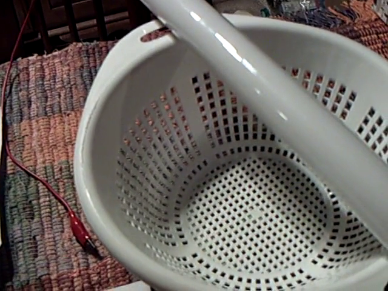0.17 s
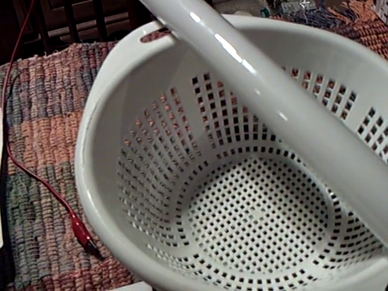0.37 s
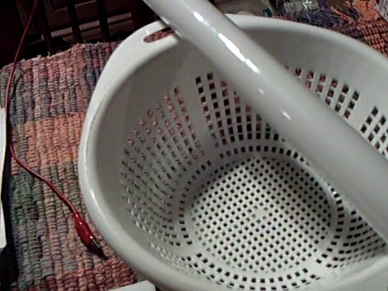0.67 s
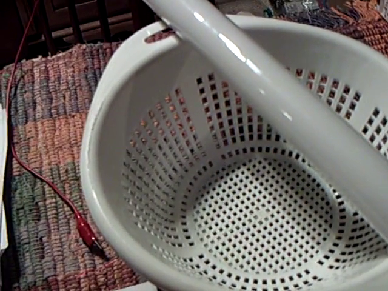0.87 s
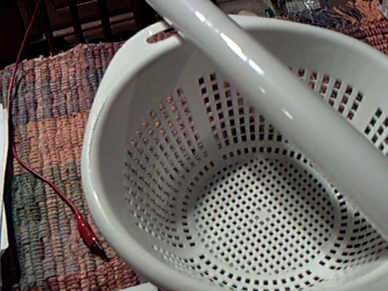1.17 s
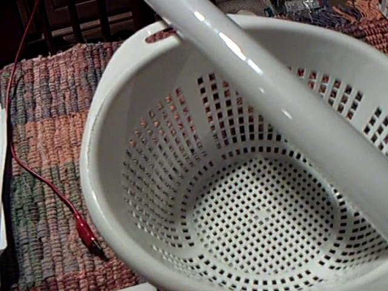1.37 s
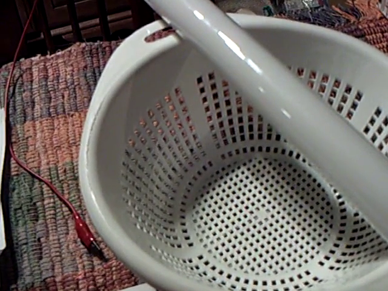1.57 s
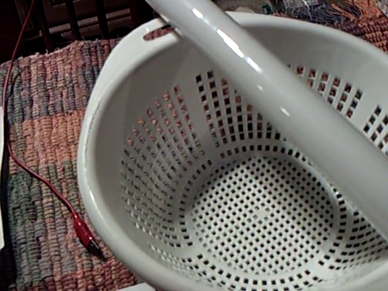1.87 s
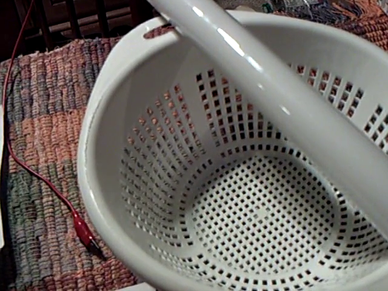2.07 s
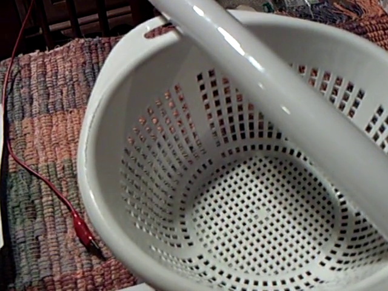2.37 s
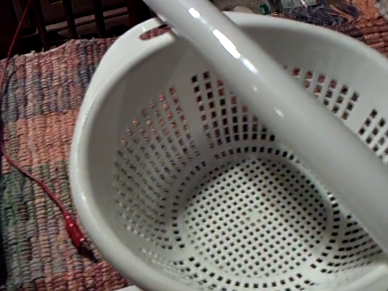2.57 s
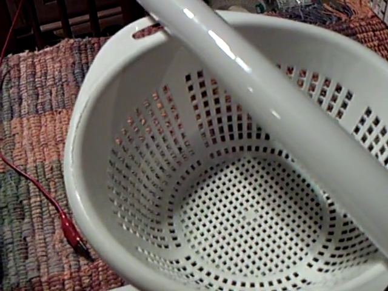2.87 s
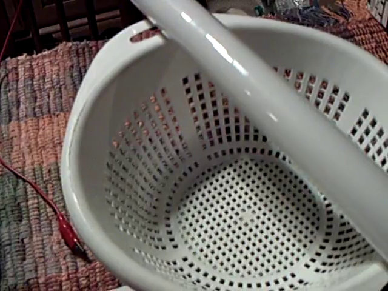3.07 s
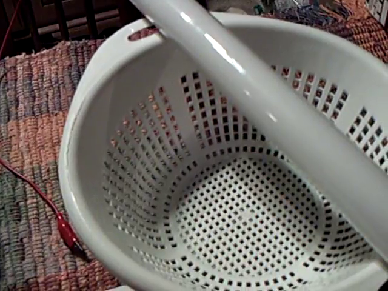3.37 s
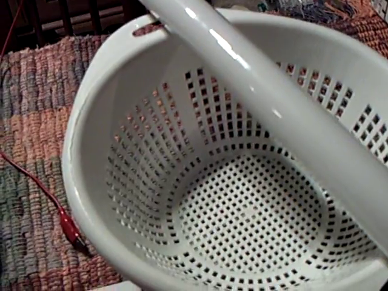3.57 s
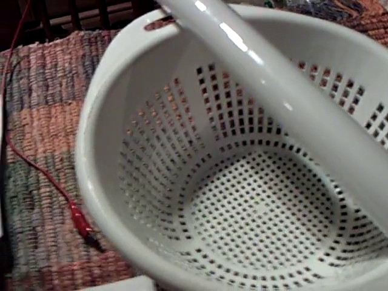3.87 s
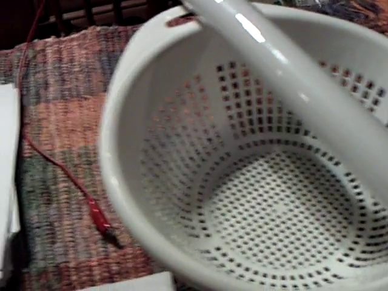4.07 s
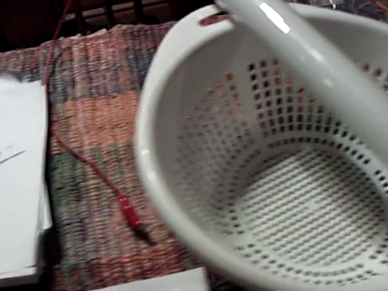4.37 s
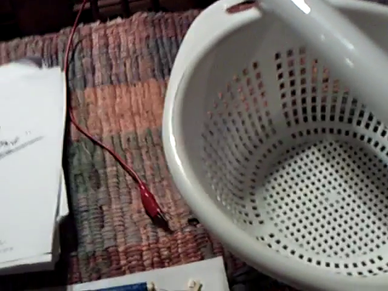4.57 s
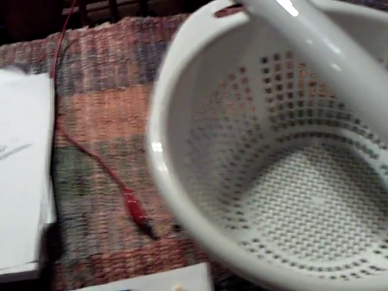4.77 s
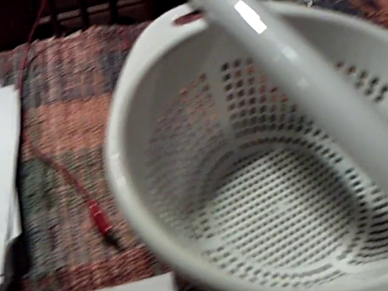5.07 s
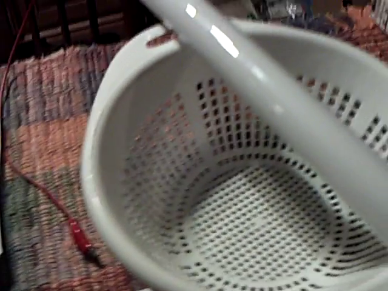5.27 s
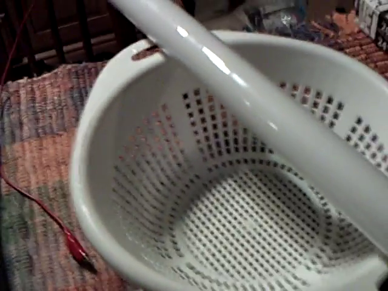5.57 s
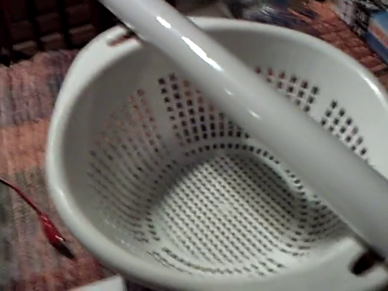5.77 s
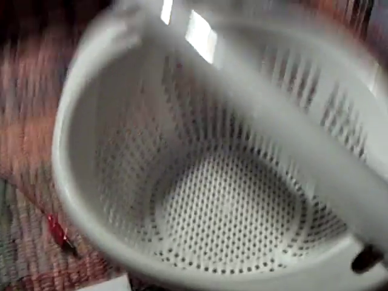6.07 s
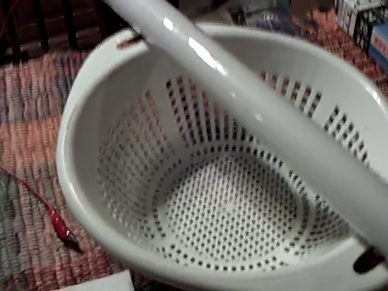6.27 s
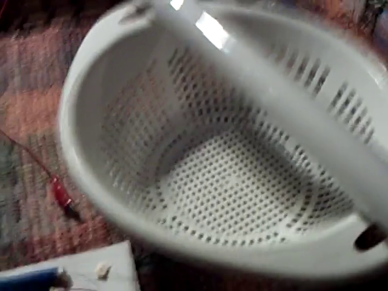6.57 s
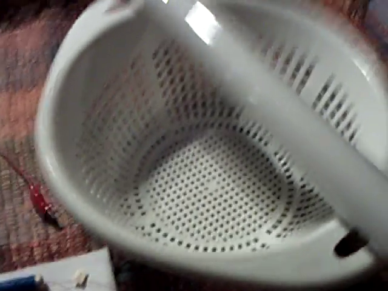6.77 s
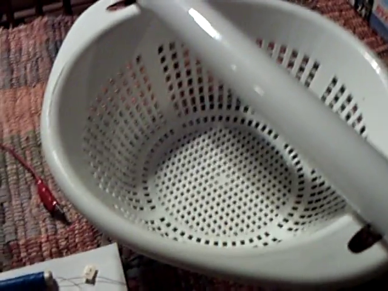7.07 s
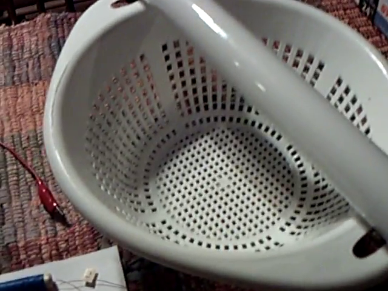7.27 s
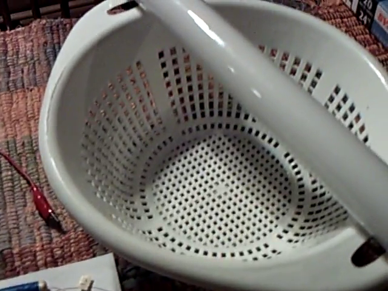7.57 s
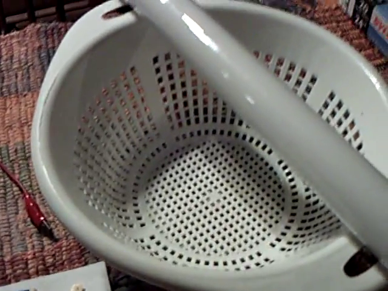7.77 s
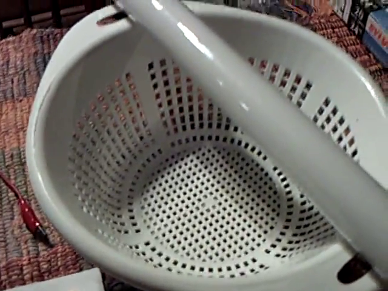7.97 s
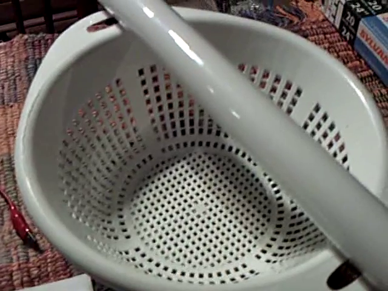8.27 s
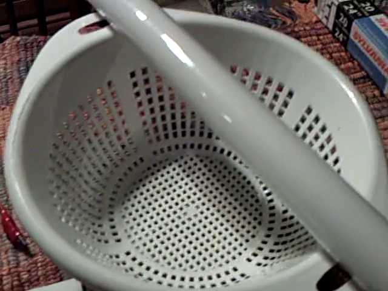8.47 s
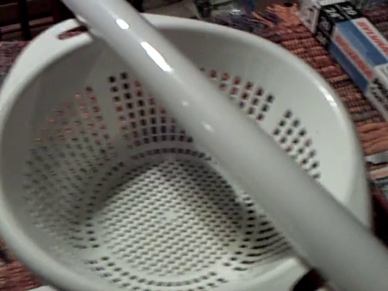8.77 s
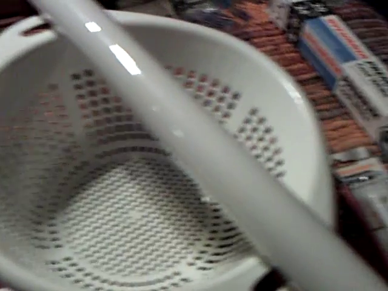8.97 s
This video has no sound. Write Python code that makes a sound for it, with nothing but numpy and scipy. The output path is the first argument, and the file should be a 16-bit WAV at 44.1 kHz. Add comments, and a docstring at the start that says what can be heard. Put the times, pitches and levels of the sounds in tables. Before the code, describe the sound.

A quiet room with low rumble, hiss and a very faint high electronic chirping, heard through a small hand-held camera. A few soft, dull knocks sound nearby. Then fingers tap, slide and snap against the plastic casing right at the microphone, with small creaks. Afterwards a distant motor hums faintly, climbing in pitch and swelling, joined by one knock and two tiny ticks before it fades.

```python
"""A quiet room through a small hand-held camera. Throughout: rumble, hiss, a faint chirping circuit.
Faint rustles near 0.6 and 2.2 s; dull knocks and a thin tick at 4-4.7 s. At 5.6-6.7 s fingers tap, slide
over and snap against the plastic casing, which rings and creaks; the grip pushes the microphone.
From 6.7 s a distant motor hums, climbs slowly in pitch and swells; a knock and two ticks fall near 8 s.
The hum fades out by 8.9 s."""
import sys
import numpy as np
from scipy import signal
from scipy.fft import rfft, irfft
from scipy.io import wavfile

SR = 44100
rng = np.random.default_rng(int(sys.argv[2]) if len(sys.argv) > 2 else 0)


def transcribe(u):
    """Save the signal u as a 16-bit wav file named by the first command-line argument.

    u: samples, shape (n,) or (channels, n), limited to [-1, 1]; the rate is SR.
    q: integer samples, one column per channel.
    """
    v = np.clip(np.atleast_2d(u).T, -1, 1)
    q = np.round(v * 32767).astype(np.int16)
    wavfile.write(sys.argv[1], SR, q)


N = 402633

# room noise spectrum: (frequency [Hz], relative density [dB])
ROOM_SPECTRUM = [(7, -32), (12, 2), (32, 0), (107, -1), (142, -3), (193, -7), (225, -6.5), (250, -9.5),
                 (331, -12.5), (857, -15.5), (1750, -23), (3500, -25.5), (4300, -24), (5200, -34),
                 (5600, -29.5)]
# noise bands in the room: (centre [Hz], width [Hz], rms [dB])
ROOM_BANDS = [(74.7, 2.6, -63.5), (136.8, 2.7, -62.5), (163.9, 9.2, -69), (4005, 230, -74.5),
              (4680, 490, -69), (5190, 320, -70)]
# faint rustles: (time [s], peak [dB], length [s], pitch [Hz], t60 [s])
FAINT_RUSTLES = [(0.553, -53, 0.24, 850, 0.036), (0.596, -54.5, 0.17, 340, 0.1),
                 (2.149, -48.5, 0.37, 338, 0.057)]
# thin ticks: (time [s], peak [dB], contact cutoff [Hz], chatter decay [s])
THIN_TICKS = [(4.62, -47.5, 9000, .003), (7.992, -51, 9050, .002), (8.092, -51, 9000, .002)]
# modes of the ticks: (frequency [Hz], gain [dB], t60 [s])
THIN_MODES = [(4000, -0.19, 0.031), (4300, -0.81, .02)]
# dull knocks: (time [s], peak [dB], contact cutoff [Hz], chatter decay [s])
DULL_KNOCKS = [(4.0035, -33.5, 2800, 0.0037), (4.013, -37, 700, 0.029), (4.1185, -39, 2500, 0.0076),
               (4.704, -39, 500, 0.0027), (4.714, -43, 600, 0.0042), (7.833, -23, 700, 0.00022)]
# modes of the knocks: (frequency [Hz], gain [dB], t60 [s])
DULL_MODES = [(244, -28, 0.024), (427, 21.5, 0.021), (535, 13, 0.036), (700, 19, 0.016), (850, 10.5, 0.052),
              (1200, 10, 0.016), (1570, -3, 0.025)]
# motor fundamental: (time [s], rms [dB])
MOTOR_FUNDAMENTAL = [(6.7, -64), (7.3, -66), (7.9, -49.5), (8.12, -49.5), (8.36, -45.5), (8.55, -48),
                     (8.72, -53), (8.9, -73)]
# swells of motor partials 2, 3, 4, one list each: (centre [s], length [s], rms at centre [dB])
MOTOR_SWELLS = [
    [(8.3, 0.48, -60.5), (8.62, 0.4, -62.5)],
    [(8.3, 0.69, -67.5), (8.66, .2, -59)],
    [(7.0, 0.65, -68), (7.75, 1, -66), (8.27, 0.33, -59), (8.52, 0.095, -59), (8.69, .14, -62.5)],
]
# grip pushing the microphone: (time [s], peak [dB], length [s])
GRIP_PUSHES = [(6.053, -37, 0.035), (6.171, -21.5, 0.0027), (6.612, -26, 0.004)]
# casing modes: (frequency [Hz], gain [dB], t60 [s])
CASING_MODES = [(524, -6.5, .036), (600, -17.5, 0.065), (699, -10.5, 0.035), (796, -7.5, 0.042),
                (960, -4.5, 0.03), (1222, -7, 0.029), (1378, 0, 0.017), (1680, 0.5, 0.007),
                (1795, -2, 0.0095), (2199, -5.5, 0.0099), (2800, -9, 0.016), (3670, -13, 0.015),
                (3850, -28.5, 0.019), (4135, -8.5, 0.014), (4470, 4, 0.007), (4994, 5.5, 0.0019)]
# casing creaks under the sliding finger: (time [s], peak [dB], length [s], pitch [Hz], t60 [s])
CASING_CREAKS = [(5.635, -39, 0.044, 766, 0.066), (5.69, -42, 0.046, 750, .06),
                 (5.94, -35.5, 0.092, 603, 0.081), (6.02, -38, 0.059, 535, 0.098)]
# finger strokes: (time [s], length [s], body [dB], rasp [dB], fade [dB/s], least damped pitch [Hz])
FINGER_STROKES = [(5.59, 0.058, -37, -39.5, 300, 910), (5.597, 0.5, -52.5, -55, 3.5, 1320),
                  (5.668, 0.084, -44.5, -48.5, 147, 850), (5.772, .17, -49.5, -60, 33, 1250),
                  (5.943, 0.23, -46.5, -65, 47, 800), (6.179, 0.055, -38, -51, 350, 900),
                  (6.251, 0.061, -42.5, -71, 59, 610), (6.474, 0.18, -47, -56.5, 70, 600),
                  (6.591, 0.054, -46.5, -54, 102, 990)]
# finger taps on the casing: (time [s], level [dB], contact cutoff [Hz], chatter decay [s])
FINGER_TAPS = [(5.5915, -21.5, 8900, 0.00057), (6.1702, 1.5, 5000, .0008), (6.1712, -18, 12000, 0.00031),
               (6.305, -56, 2470, .001), (6.323, -43.5, 3000, .001), (6.478, -46.5, 1200, .004),
               (6.5655, -38.5, 15000, 0.00052), (6.571, -25.5, 700, 0.0016), (6.5765, -31, 4000, 0.00075),
               (6.6062, -21.5, 2970, 0.00045), (6.6115, -20, 890, 0.00067), (6.628, -31, 800, 0.0032)]


def from_db(db):
    """Decibels to gain."""
    return 10 ** (np.asarray(db) / 20)


def unit_rms(x):
    """Scale to rms 1."""
    return x / np.sqrt(np.mean(x ** 2) + 1e-20)


def drift(rate_hz):
    """Unit Gaussian values at rate_hz, joined by straight lines."""
    return np.interp(np.arange(N) * rate_hz / SR, np.arange(N // 50), rng.standard_normal(N // 50))


def ring(force, modes):
    """Damped modes driven by a force, neighbours in opposite sign."""
    out = np.zeros(len(force))
    for k, (hz, db, t60_s) in enumerate(modes):
        radius, angle = from_db(-60 / (t60_s * SR)), 2 * np.pi * hz / SR
        feedback = [1, -2 * radius * np.cos(angle), radius * radius]
        out += (-1) ** k * from_db(db) * signal.lfilter([0, np.sin(angle)], feedback, force)
    return out


def place(out, time_s, sound, peak_db):
    """Mix a sound in at the given time and peak."""
    i = round(time_s * SR)
    out[i:i + len(sound)] += from_db(peak_db) * sound / np.abs(sound).max()


def room(floor_db=-50.5):
    """Rumble and hiss: coloured noise plus resonant noise bands."""
    hz = np.maximum(np.fft.rfftfreq(N, 1 / SR), 1)
    points_hz, points_db = np.transpose(ROOM_SPECTRUM)
    colour = from_db(np.interp(np.log(hz), np.log(points_hz), points_db))
    out = from_db(floor_db) * unit_rms(irfft(colour * rfft(rng.standard_normal(N)), N))
    for centre_hz, width_hz, db in ROOM_BANDS:
        band = 1 / (1 + (2 * (hz - centre_hz) / width_hz) ** 2)
        out += from_db(db) * unit_rms(irfft(band * rfft(rng.standard_normal(N)), N))
    return out


def circuit(rate_hz=29.108, base_hz=5240, arch_hz=204, level_db=-68):
    """Camera circuit: a thin, wavering, gated tone; pitch arches up mid-chirp."""
    start_s, length_s, edge_s = .0032, .021, .004
    t = np.arange(N) / SR % (1 / rate_hz) - start_s
    hz = base_hz + arch_hz * np.sin(np.pi * np.clip(t / length_s, 0, 1)) + 80 * drift(300)
    gate = np.clip(np.minimum(t, length_s - t) / edge_s, 0, 1)
    gain = np.sqrt(2) * from_db(level_db + 0.82 * drift(40))
    return gate * gain * np.sin(2 * np.pi * np.cumsum(hz) / SR)


def rubbing(events):
    """Rustles or creaks: short swells of noise in one resonance."""
    out = np.zeros(N)
    for time_s, db, length_s, hz, t60_s in events:
        noise = rng.standard_normal(SR)
        swell = np.hanning(round(length_s * SR))
        place(out, time_s, swell * ring(noise[:len(swell)], [(hz, 0, t60_s)]), db)
    return out


def impacts(events, modes):
    """A blow plus brief chatter rings a body; softer contacts pass less treble."""
    out, t = np.zeros(N), np.arange(SR // 10) / SR
    for time_s, db, cutoff_hz, decay_s in events:
        force = 0.07 * rng.standard_normal(len(t)) * np.exp(-t / decay_s)
        force[0] = -1   # the blow
        softened = signal.lfilter(*signal.butter(2, cutoff_hz, fs=SR), force)
        place(out, time_s, ring(softened, modes), db)
    return out


def motor(start_hz=193.7, goal_hz=245.3, settle_s=1.9):
    """Distant motor creeping up to speed: four partials, wavering on their way through the walls."""
    t = np.arange(N) / SR
    times_s, levels_db = np.transpose(MOTOR_FUNDAMENTAL)
    start_s, end_s = times_s[0], times_s[-1]
    hz = goal_hz - (goal_hz - start_hz) * np.exp(-np.maximum(t - start_s, 0) / settle_s)
    phase = 2 * np.pi * np.cumsum(hz) / SR
    gains = [from_db(np.interp(t, times_s, levels_db))]
    for swells in MOTOR_SWELLS:
        gains.append(sum(from_db(db) * np.cos(np.pi * np.clip((t - centre_s) / length_s, -.5, .5))
                         for centre_s, length_s, db in swells))
    hum = np.zeros(N)
    for k, gain in enumerate(gains):
        waver = from_db((0.8 + 0.35 * k) * drift(12))
        hum += gain * waver * np.sin((k + 1) * phase + k)
    return np.sqrt(2) * hum * ((t > start_s) & (t < end_s))


def grip():
    """The shifting grip puts pressure bumps on the microphone."""
    out = np.zeros(N)
    for time_s, db, length_s in GRIP_PUSHES:
        place(out, time_s, np.hanning(round(length_s * SR)), db)
    return out


def radiate(x, cutoff_hz=400):
    """A small casing radiates little below its first mode."""
    return signal.lfilter(*signal.butter(2, cutoff_hz, "high", fs=SR), x)


def finger_slides(grains_per_s=7000, split_hz=2500, skin_db=-5, attack_s=.008, release_s=.0081):
    """Skin sticks and slips in grains; the grip damps all modes, the low ones least near free_hz."""
    t60_scale, fall_oct_per_s = .7, 1.9
    slips = rng.random(N) < grains_per_s * from_db(1.5 * drift(60)) / SR
    grains = slips * rng.standard_normal(N)
    rings = [(hz, radiate(ring(grains, [(hz, db, t60_scale * t60_s)]))) for hz, db, t60_s in CASING_MODES]
    low_rings = [(hz, sound) for hz, sound in rings if hz < split_hz]
    low_rms = np.sqrt(sum(np.mean(sound ** 2) for hz, sound in low_rings))
    treble = sum(sound for hz, sound in rings if hz > split_hz)
    # further grains, heard directly
    skin = signal.lfilter(*signal.butter(2, [2200, 4000], "band", fs=SR), rng.permutation(grains))
    rasp = unit_rms(unit_rms(treble) + from_db(skin_db) * unit_rms(skin))
    out = np.zeros(N)
    for time_s, length_s, body_db, rasp_db, fade_db_per_s, start_hz in FINGER_STROKES:
        t = np.arange(round((length_s + release_s) * SR)) / SR
        span = slice(round(time_s * SR), round(time_s * SR) + len(t))
        free_hz = start_hz * 2 ** (-fall_oct_per_s * t)   # sinks as the finger presses on
        body = sum(from_db(4 - 11 * np.abs(np.log2(hz / free_hz))) * sound[span]
                   for hz, sound in low_rings)
        touch = np.clip(np.minimum(t / attack_s, (t[-1] - t) / release_s), 0, 1)
        friction = from_db(body_db) * body / low_rms + from_db(rasp_db) * rasp[span]
        out[span] += touch * from_db(-fade_db_per_s * t) * friction
    return out


def finger_taps():
    """Taps and snaps ring the plastic casing."""
    return radiate(impacts(FINGER_TAPS, CASING_MODES))


def scene():
    """All sources at one microphone."""
    hands = finger_taps() + finger_slides() + grip()
    background = room() + circuit()
    knocks = impacts(DULL_KNOCKS, DULL_MODES)
    hum = motor()
    rustles = rubbing(FAINT_RUSTLES)
    creaks = rubbing(CASING_CREAKS)
    ticks = impacts(THIN_TICKS, THIN_MODES)
    return (background + rustles + ticks + knocks + hum + creaks + hands)[None]


def record(dry, antialias_hz=5480, rolloff_hz=5680, cutoff_hz=6700):
    """Camera samples at SR / 4: treble mirrors above the fold at SR / 8 and rolls off; the top is cut."""
    clipped = np.clip(dry, -1.3, 1.3)
    smooth = signal.sosfilt(signal.ellip(8, .3, 50, antialias_hz, fs=SR, output="sos"), clipped)
    sampled = 4 * smooth * (np.arange(N) % 4 == 0)
    rolled_off = signal.sosfilt(signal.butter(16, rolloff_hz, fs=SR, output="sos"), sampled)
    return signal.sosfilt(signal.ellip(8, .1, 70, cutoff_hz, fs=SR, output="sos"), rolled_off)


dry = scene()
out = record(dry)
transcribe(out)
```